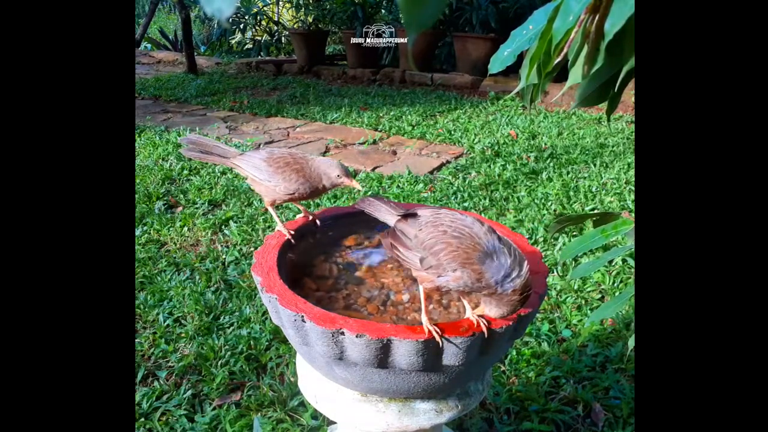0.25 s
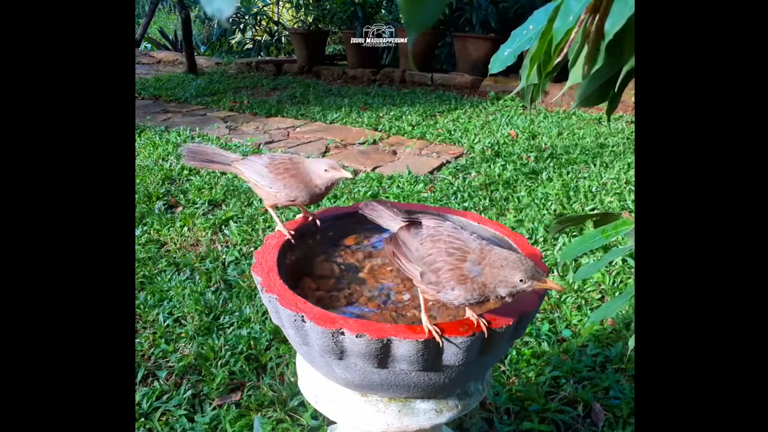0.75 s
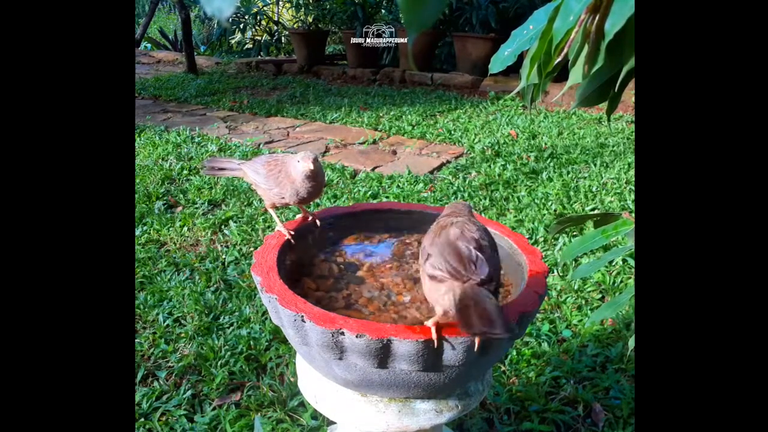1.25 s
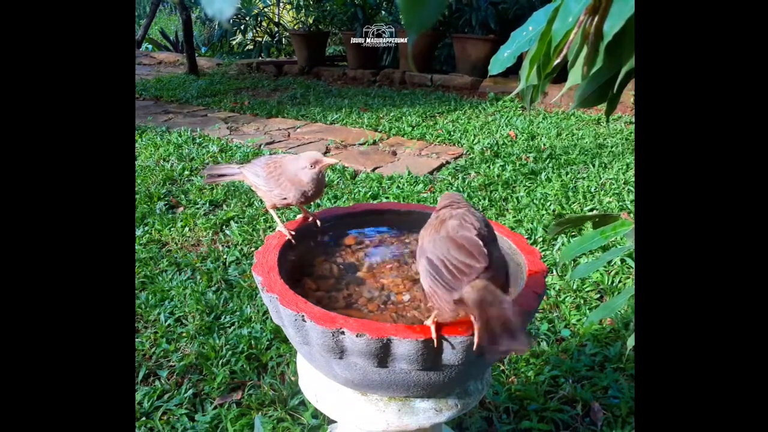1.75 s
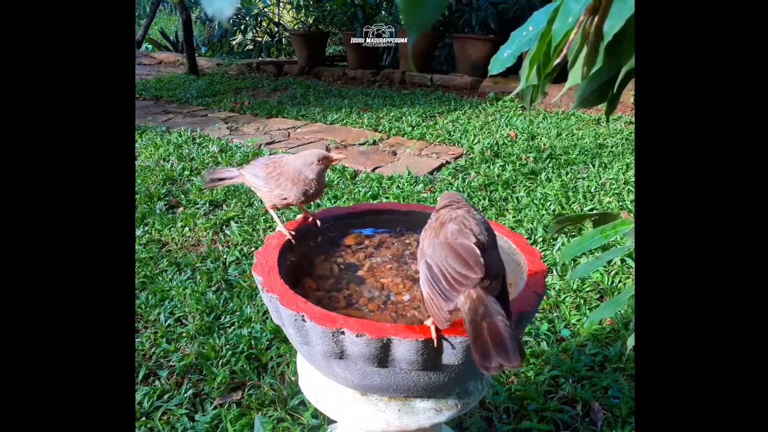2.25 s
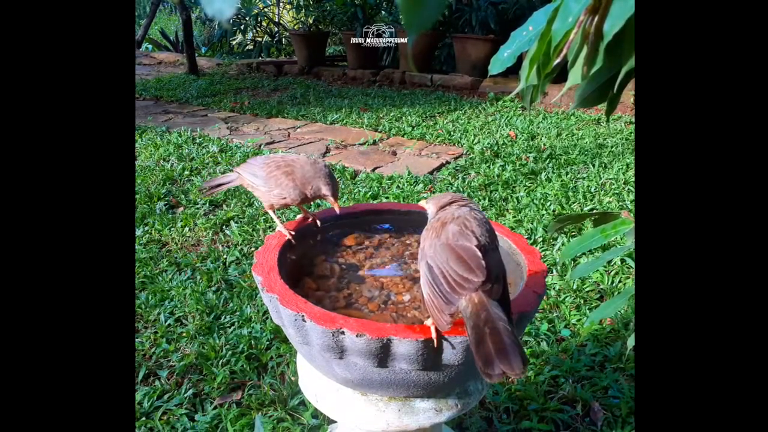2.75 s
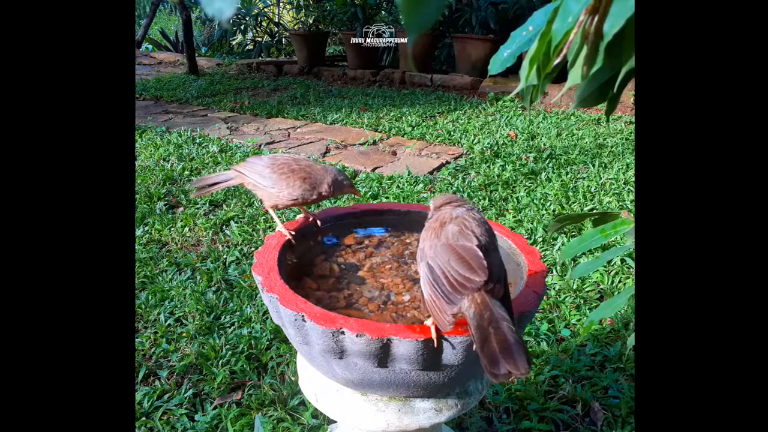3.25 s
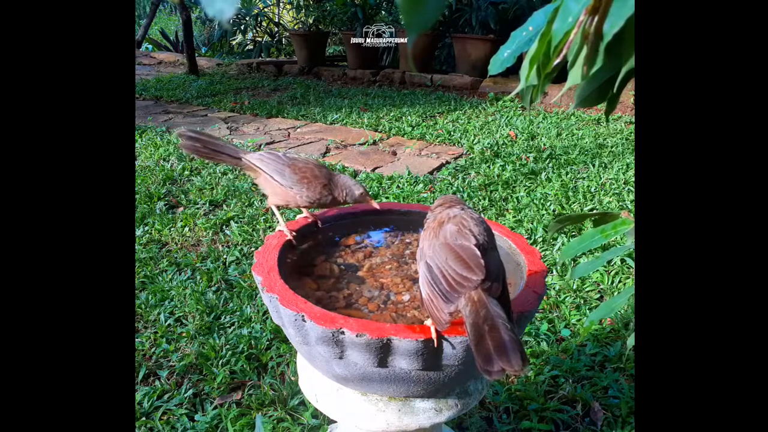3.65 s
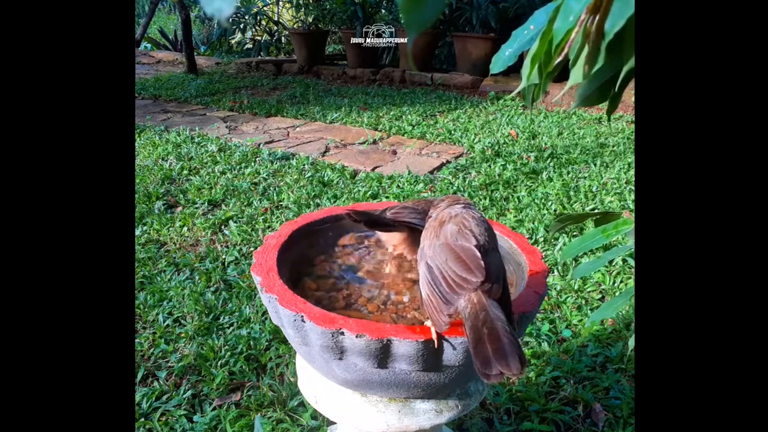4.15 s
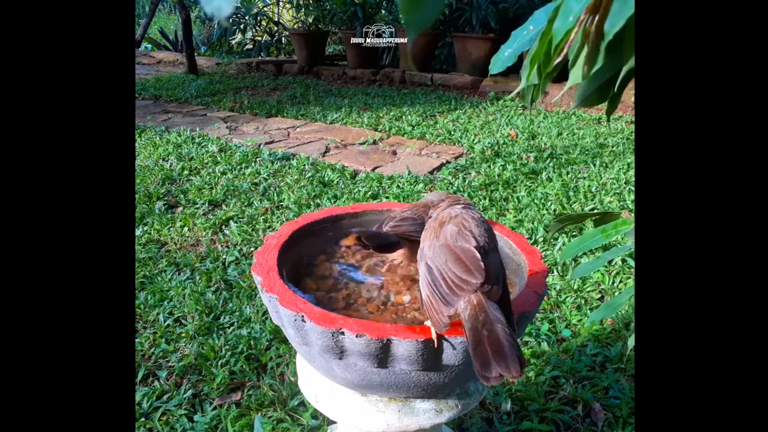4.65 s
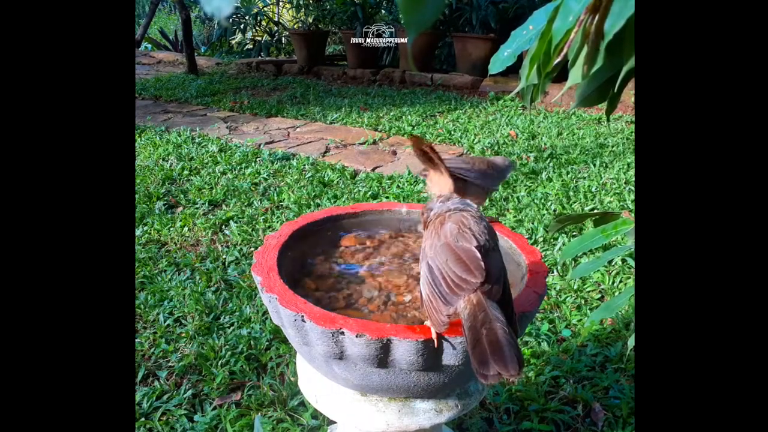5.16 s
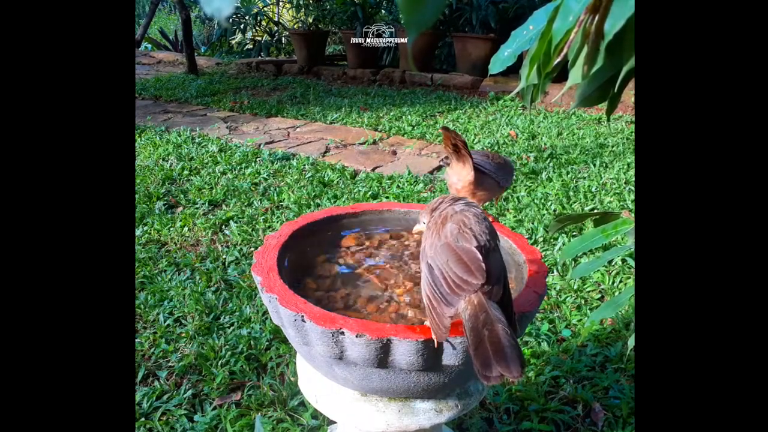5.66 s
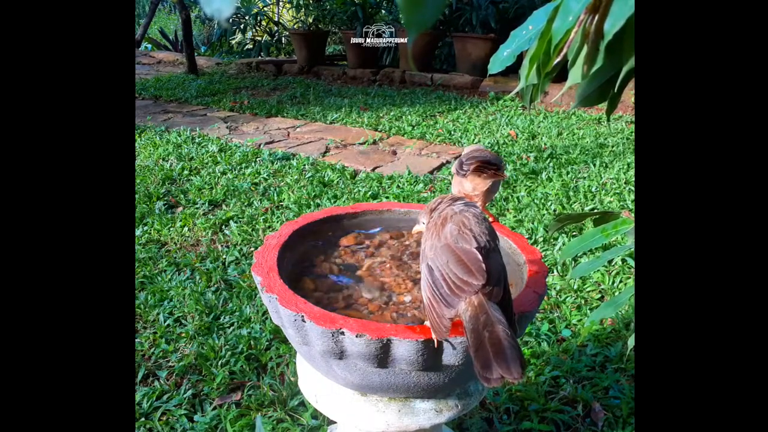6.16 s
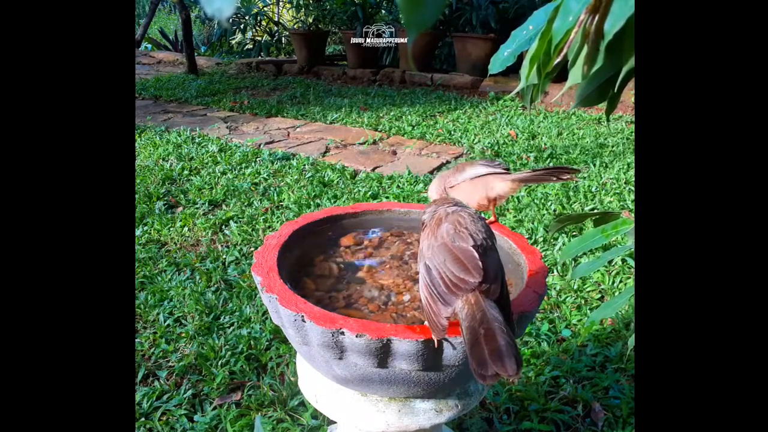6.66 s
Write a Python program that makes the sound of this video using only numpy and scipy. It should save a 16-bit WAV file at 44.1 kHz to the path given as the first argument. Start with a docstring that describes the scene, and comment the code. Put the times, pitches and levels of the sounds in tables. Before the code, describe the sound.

Two birds shake and splash in a stone water bowl, with far gliding hoots, chirping from trees, shrill insects and a faint engine drone.

```python
"""Two babblers at a garden bird bath, close to the microphones: wet feathers rustle, fling spray and push puffs
of air, all shaped noise; a foot plops into the water as a ringing air pocket, and claws tick on the stone.
Some way off two animals hoot in gliding tones, one breaking into a hoarse high register; birds chirp near by
and in the trees with short bent notes, some roughened by jitter.
Insects shrill throughout as pulsing bands of noise, over the low tones and rumble of distant engines."""
import sys
import numpy as np
from scipy import signal
from scipy.fft import rfft, irfft, next_fast_len
from scipy.io import wavfile
from scipy.ndimage import map_coordinates

SR = 44100
rng = np.random.default_rng(int(sys.argv[2]) if len(sys.argv) > 2 else 0)


def wav_out(sig):
    """Save sig, one row per channel (or a flat mono array), as 16-bit PCM at SR to the path in sys.argv[1]."""
    wavfile.write(sys.argv[1], SR, np.round(np.clip(np.atleast_2d(sig).T, -1, 1) * 32767).astype(np.int16))


N = 304731
T = np.arange(N) / SR


def amp(db):
    """Decibels to gain."""
    return 10 ** (np.asarray(db) / 20)


def unit(x):
    """Scaled to rms 1."""
    return x / np.sqrt(np.mean(np.abs(x) ** 2) + 1e-20)


def along(points, hz):
    """(Hz, value) points read on a log frequency axis."""
    f, v = np.transpose(points)
    return np.interp(np.log(hz + 1), np.log(f + 1), v)


def wobble(rate, size=N):
    """A smooth random curve, rate knots a second."""
    knots = rng.standard_normal(int(size * rate / SR) + 4)
    return map_coordinates(knots, [np.arange(size) * rate / SR])


def filtered(x, response):
    """x with its spectrum multiplied by a response of frequency."""
    m = next_fast_len(N + 8192)
    return irfft(rfft(x, m) * response(np.fft.rfftfreq(m, 1 / SR)), m)[..., :N]


def rush(spectrum):
    """Stereo noise of rms 1, alike in the bass and nearly unrelated in the treble."""
    # likeness of left and right: (frequency [Hz], correlation [-1 to 1])
    likeness = [(60, 0.96), (130, 0.9), (260, 0.84), (600, 0), (1500, 0), (6000, 0.031)]

    def mid_side(hz):
        turn = np.arccos(np.clip(along(likeness, hz), -1, 1)) / 2
        return amp(along(spectrum, hz)) * [np.cos(turn), np.sin(turn)]

    mid, side = filtered(rng.standard_normal((2, N)), mid_side)
    return unit(np.array([mid + side, mid - side]))


def band(centre_hz, width_hz):
    """A narrow stereo noise of rms 1."""
    noise = rng.standard_normal((2, N))
    return unit(filtered(noise, lambda hz: 1 / (1 + ((hz - centre_hz) / width_hz) ** 4)))


def add(track, s, sound):
    """Mix a sound into a track at time s."""
    part = track[max(round(s * SR), 0):][:len(sound)]
    part += sound[:len(part)]


def placed(x, lead_ms, left_db):
    """Direct sound at two microphones: the left hears it earlier by lead_ms and louder by left_db."""
    side = np.array([[.5], [-.5]])
    lead_s = side * lead_ms / 10 ** 3
    return amp(side * left_db) * filtered(x, lambda hz: np.exp(2j * np.pi * hz * lead_s))


def garden(x):
    """Scatter from trees and walls: a noise tail in which each frequency dies at its own speed."""
    # reverberation of the garden: (frequency [Hz], time to fall 60 dB [s])
    decay = [(200, 0.31), (2000, 0.51), (4500, 0.53), (10000, 0.039)]
    hz, t, z = signal.stft(rng.standard_normal((2, SR // 2)), SR, nperseg=256)
    fading = z * amp(-60 * t / along(decay, hz)[:, None])
    tail = signal.istft(fading, SR, nperseg=256)[1]
    tail = tail / np.linalg.norm(tail, axis=1, keepdims=True)
    return signal.fftconvolve(x[None], tail, axes=1)[:, :N]


def envelope(start, length, attack, release):
    """Rises from 0, is held to at most 1 and is back at 0 after length."""
    return np.clip(np.minimum((T - start) / attack, (start + length - T) / release), 0, 1)


def strokes(rows):
    """Gain of (s, length, dB) gestures, each a quick throw and a slower fall."""
    track = np.zeros(N)
    for s, length, db in rows:
        u = np.linspace(0, 1, int(length * SR))
        add(track, s, amp(db) * np.sin(np.pi * u ** .5) ** 2)
    return track


def note(length, start_hz, middle_hz, end_hz):
    """Phase and swell of one note whose pitch follows a parabola."""
    u = np.linspace(0, 1, int(length * SR))
    hz = np.polyval(np.polyfit([0, .5, 1], [start_hz, middle_hz, end_hz], 2), u)
    return 2 * np.pi * np.cumsum(hz) / SR, np.abs(np.sin(np.pi * u)) ** .7


def glide(hz, change_hz):
    """Start, middle and end pitch of a straight glide."""
    return hz - change_hz / 2, hz, hz + change_hz / 2


def chirp(length, start_hz, middle_hz, end_hz, rasp):
    """One note roughened by fast jitter of its phase."""
    phase, swell = note(length, start_hz, middle_hz, end_hz)
    return swell * np.sin(phase + 2 * rasp * wobble(501.0, len(phase)))


def whistle(length, start_hz, middle_hz, end_hz, rasp, overtone_db):
    """One soft-edged, wavering note with overtones."""
    phase, swell = note(length, start_hz, middle_hz, end_hz)
    phase = phase + 2 * rasp * wobble(130.7, len(phase))
    overtones = sum(np.sin((k + 1) * phase) / k ** 1.3 for k in range(1, 5))
    return swell ** 2 * (np.sin(phase) + amp(overtone_db) * overtones)


def hoots():
    """Nearly pure tones that jump up a register and turn hoarse when forced; a second animal joins in."""
    # the first animal: (time [s], length [s], low pitch [Hz], base level [dB], break after [s],
    # break length [s], high pitch before it sags [Hz], hoarse for [s])
    calls = [(-.05, .42, 673, -49.5, 0.079, .26, 806.6, 0.042),
             (0.749, 0.566, 685, -51.5, .05, .46, 798.8, 0.396),
             (1.519, 0.41, 641, -53.5, .125, .175, 765.5, .09), (2.184, 0.37, 645.4, -52, 0, 0, 646, 0.04)]
    # the second animal: (time [s], length [s], start [Hz], middle [Hz], end [Hz], relative level [dB])
    answers = [(0.286, 0.079, 771, 763, 742, -46.5), (0.344, 0.1, 679, 672, 670, -53),
               (0.885, 0.133, 621, 652, 680, -49.5), (1.255, 0.053, 854, 861, 815, -51)]
    attack_s, release_s = 0.068, 0.11
    # the pitch scoops up at the start and droops as the breath runs out
    scoop_hz, scoop_s, droop_hz, droop_s = 40.3, 0.059, 89, 0.158
    # the high register: entered fast, left slowly, sagging, louder
    break_up_s, break_down_s, sag_hz, high_db = .018, 0.0423, 88.5, 6
    # roughness 0-1; a hoarse voice is weaker
    clear_rough, hoarse_rough, hoarse_fade_s, hoarse_db = 0.19, 0.64, 0.031, -3
    voice, loudness = np.zeros(N), np.zeros(N)
    for s, length, low_hz, db, break_after, break_length, high_hz, hoarse_for in calls:
        break_s = s + break_after
        scoop = np.clip(1 - (T - s) / scoop_s, 0, 1)
        droop = np.clip(1 - (s + length - T) / droop_s, 0, 1)
        low = low_hz - scoop_hz * scoop - droop_hz * droop ** 2
        high = envelope(break_s, break_length, break_up_s, break_down_s)
        sag = sag_hz * np.interp(T, [break_s, break_s + break_length], [0, 1])
        hz = low + high * (high_hz - sag - low)
        hoarse = envelope(break_s, hoarse_for, break_up_s, hoarse_fade_s)
        rough = np.clip(clear_rough + (hoarse_rough - clear_rough) * hoarse, 0, 1)
        flutter = np.sqrt(1 - rough ** 2) + rough * unit(wobble(130) + 1j * wobble(130))
        breath = envelope(s, length, attack_s, release_s) ** 0.91
        swell = np.sqrt(2) * amp(db + high_db * high + hoarse_db * hoarse) * breath
        voice += swell * np.real(flutter * np.exp(2j * np.pi * np.cumsum(hz) / SR))
        loudness += swell
    for s, length, start_hz, middle_hz, end_hz, db in answers:
        phase, swell = note(length, start_hz, middle_hz, end_hz)
        add(voice, s, amp(db) * swell * np.sin(phase + 0.5 * wobble(99.3, len(phase))))
    direct = placed(voice, lead_ms=.2, left_db=6)
    husk = amp(-19.5) * loudness * band(723, 220)  # a husky haze around the tone
    return direct + amp(-9.5) * garden(voice) + husk


def insects():
    """A buzzing chorus that swells in waves, a throbbing trill and a cricket that chirps at an even pace."""
    # colour of the chorus: (frequency [Hz], relative density [dB per Hz])
    chorus_colour = [(5600, -48.5), (6250, -22.5), (6800, -18), (7300, -14.5), (7900, -13), (8700, -19),
                     (9400, -11), (9900, -5), (10250, -0.5), (10600, -1.5), (10900, -9.5), (11500, -17.5),
                     (11800, -44), (14000, -67)]
    # waves that build up slowly and then fall back together: (time of the fall [s], build-up [dB])
    waves = [(-.03, 1.5), (1.36, 2.5), (2.85, 2), (4.02, 3), (5.41, 2.5), (6.8, 4)]
    chorus_db, fall_back_s = -57, .11  # level between the waves, and how fast a wave ends
    points = [point for s, db in waves for point in ((s, db), (s + fall_back_s, 0))]
    build = np.interp(T, *np.transpose(points))
    buzz = 1 + 0.11 * np.sin(2 * np.pi * np.cumsum(148 + 2 * wobble(4.3)) / SR)
    chorus = amp(chorus_db + build + 0.16 * wobble(11)) * buzz * rush(chorus_colour)
    chorus = chorus * amp([[1], [-1]])  # 2 dB stronger on the left
    throb = 1 + 0.22 * np.sin(2 * np.pi * np.cumsum(12.5 + 1.0 * wobble(1.97)) / SR)
    trill = amp(-67) * throb * band(8243, 190)
    beat = np.cos(np.pi * (T - .59) / .643) ** 6  # a chirp every 0.643 s
    return chorus + trill + amp(-66) * beat * band(7270, 150)


def background():
    """Distant engines drone in slowly wavering low tones over a soft rumble, with a faint hiss."""
    # engine tones: (frequency [Hz], mean level [dB rms, before a slight tilt to the left])
    engine_tones = [(33.3, -67.5), (52.4, -60), (66.6, -58.5), (75, -63), (105, -68.5), (150, -77.5),
                    (225.4, -78.5)]
    # colour of the rumble: (frequency [Hz], relative density [dB per Hz])
    air_colour = [(20, -16), (40, -5.5), (65, 1.5), (100, -3), (200, -11.5), (400, -19.5), (700, -24),
                  (1200, -29.5), (2000, -30.5), (6000, -40), (12000, -73)]
    drone = np.zeros(N)
    for hz, db in engine_tones:
        level = amp(db + wobble(2.11)) * np.sqrt(2)
        drone += level * np.sin(2 * np.pi * (hz * T + rng.random()) + 0.26 * wobble(1.96))
    rumble = amp(-57.5) * rush(air_colour) * amp(wobble(3.96))
    hiss = amp(-70.5) * rush([(500, -17), (2500, -16.0), (9000, 18.5), (11500, -11), (12500, -41)])
    return (drone + rumble) * amp([[.5], [-.5]]) + hiss  # low sounds 1 dB stronger on the left


def tree_birds():
    """Raspy chirps and thin whistles, bent notes heard mostly by way of the trees."""
    # buzzy high chirps: (time [s], middle pitch [Hz], relative level [dB])
    buzzes = [(.28, 5860, -60.5), (.467, 5300, -56.5), (.654, 4790, -61), (5.845, 5670, -64.5),
              (5.86, 4670, -66), (6.035, 5080, -60.5), (6.161, 5085, -56)]
    # down-slurred chirps: (time [s], middle pitch [Hz], fall [Hz], relative level [dB])
    slurs = [(.134, 3650, 670, -70), (.386, 2760, 820, -57.5), (1.208, 2080, 188, -71),
             (1.448, 2007, 80, -71), (4.085, 2918, 1000, -49), (4.297, 2245, 1050, -46),
             (4.432, 2020, 500, -45.5), (5.296, 2425, 100, -54.5)]
    # a rising call: (time [s], relative level [dB], relative level of the lead-in note [dB])
    risers = [(.802, -53.5, -68), (6.314, -52.5, -60.5)]
    # its two notes: (length [s], start [Hz], middle [Hz], end [Hz])
    lead_in = (.063, 2625, 2940, 3350)
    riser_note = (.1, 3560, 4040, 4080)
    # a far two-note whistle: (time [s], first middle pitch [Hz], second middle pitch [Hz],
    # relative level of the second note [dB], rasp [units of 2 radians of phase jitter])
    whistles = [(.38, 1395, 1474, -72, 1.1), (1.84, 1377, 1490, -69, 0.52),
                (3.251, 1501, 1404, -66.5, 1.46), (4.7, 1355, 1495, -69, 0.55),
                (6.1, 1387, 1550, -67.5, 0.6)]
    # a far nasal cry in two notes: (time [s], length [s], start [Hz], middle [Hz], end [Hz],
    # relative level [dB], overtones [dB])
    cry = [(5.665, 0.1405, 932, 1034, 1046, -59.5, -9.5), (5.765, 0.1295, 1045, 1008, 936, -67, 1.5)]
    # a faint low coo: (time [s], length [s], start [Hz], middle [Hz], end [Hz], relative level [dB])
    coo = (7, .14, 564, 612, 660, -65.5)
    buzz_length_s, buzz_fall_hz, buzz_rasp = .076, 550, 1.3
    slur_length_s, slur_rasp = .052, 0.5
    riser_after_s, riser_rasp = .021, 0.56
    first_length_s, first_db, second_after_s, second_length_s, rise_hz = 0.27, -3, .12, 0.216, 40
    voice = np.zeros(N)
    for s, hz, db in buzzes:
        add(voice, s, amp(db) * chirp(buzz_length_s, *glide(hz, -buzz_fall_hz), buzz_rasp))
    for s, hz, fall_hz, db in slurs:
        add(voice, s, amp(db) * chirp(slur_length_s, *glide(hz, -fall_hz), slur_rasp))
    for s, db, lead_db in risers:
        add(voice, s, amp(lead_db) * chirp(*lead_in, riser_rasp))
        add(voice, s + riser_after_s, amp(db) * chirp(*riser_note, riser_rasp))
    for s, first_hz, second_hz, db, rasp in whistles:
        first = whistle(first_length_s, *glide(first_hz, rise_hz), rasp, overtone_db=-40)
        second = whistle(second_length_s, *glide(second_hz, rise_hz), rasp, overtone_db=-40)
        add(voice, s, amp(db + first_db) * first)
        add(voice, s + second_after_s, amp(db) * second)
    for s, *shape, db, overtone_db in cry:
        add(voice, s, amp(db) * whistle(*shape, rasp=0.21, overtone_db=overtone_db))
    s, *shape, db = coo
    add(voice, s, amp(db) * whistle(*shape, rasp=0.43, overtone_db=-16))
    return amp(-2.5) * placed(voice, lead_ms=0.11, left_db=6.5) + amp(1.0) * garden(voice)


def wings():
    """Wet feathers rustle, fling spray and push puffs of air: three noises under the wing strokes."""
    # shakes of wet feathers: (time [s], length [s], relative level [dB])
    feathers = [(.195, 0.24, -67), (.34, 0.35, -66.5), (.6, 0.62, -70), (.95, 0.64, -77.5),
                (1.42, 0.32, -82), (1.59, 0.2, -73.5), (5.075, 0.083, -65.5), (5.175, .11, -74.5),
                (5.345, .13, -69), (5.57, 0.29, -75)]
    # colour of the rustle: (frequency [Hz], relative density [dB per Hz])
    feather_colour = [(200, 0.5), (600, -8), (1500, -12), (4000, -3), (8000, 3.5), (11000, 4), (13000, 2.5),
                      (16000, -26)]
    # wing strokes that fling spray: (time [s], length [s], level [dB])
    flicks = [(.24, 0.38, -60), (0.366, 0.083, -46.5), (0.419, 0.07, -50.5), (.44, 0.26, -61),
              (3.944, 0.04, -50), (3.973, 0.058, -48), (4.432, 0.031, -55.5), (5.085, 0.034, -63),
              (5.359, 0.049, -67), (6.733, 0.044, -51)]
    # colour of the spray: (frequency [Hz], relative density [dB per Hz])
    spray_colour = [(300, 1), (900, -3), (2800, -1), (6000, 0), (10000, -1), (12000, -1), (15500, -22)]
    # air pushed by bouts of flapping: (time [s], length [s], level [dB])
    wafts = [(.16, 0.4, -62), (.395, 0.21, -58), (.73, 0.39, -54.5), (.98, 0.55, -59.5)]
    puff_colour = [(60, -27), (130, -3), (300, -9.0), (550, -4), (1200, -15.5), (3000, -34), (8000, -55)]
    crackle = amp(1.3 * wobble(60) + 2.0 * wobble(900))
    rustle = strokes(feathers) * amp(11.5) * unit(rush(feather_colour) * crackle)
    droplets = amp(3.5 * wobble(1200) + 2 * wobble(150))
    spray = strokes(flicks) * unit(rush(spray_colour) * droplets)
    wingbeat = np.cos(2 * np.pi * np.cumsum(18 + 2 * wobble(4.96)) / SR)  # about 18 beats a second
    puffs = unit(rush(puff_colour) * amp(5.7 * wingbeat))
    return rustle + spray + strokes(wafts) * puffs


def chip():
    """The sharp chip of a bird close by: a quick falling note with a strong octave."""
    # pitch of the note: (start [Hz], middle [Hz], end [Hz])
    chip_pitch = (3606, 3350, 3066)
    chip_s, length_s, level_db = 3.509, 0.035, -36.5
    phase, swell = note(length_s, *chip_pitch)
    size = len(phase)
    jittered = phase + .15 * wobble(500, size)
    first, second, third = np.sin(np.outer([1, 2, 3], jittered))
    tone = first + amp(6.0 + 1.7 * wobble(450, size)) * second + amp(-6.5) * third
    voice = np.zeros(N)
    add(voice, chip_s, amp(level_db) * swell ** 1.35 * tone)
    return placed(voice, lead_ms=0.055, left_db=-5.5) + amp(-23.5) * garden(voice)


def footfalls():
    """Drops and claws on the stone: noise cracks with a short rim ring, then scrapes in a narrow band."""
    # drops and claws on the stone: (time [s], level [dB], rim ring relative to it [dB])
    ticks = [(3.9758, -30.5, -4), (3.9865, -26, -22), (6.671, -58, 13.5), (6.8166, -37, -3)]
    # claws scraping for a hold on the rim: (time [s], length [s], level [dB])
    scrapes = [(6.715, 0.12, -60.5), (6.8, .2, -61)]
    t = np.arange(SR // 8) / SR
    rim_hz, crack_t60_s, ring_t60_s = 2850, 0.0012, 0.003
    track = np.zeros(N)
    bright = signal.butter(2, [4000, 10000], "bandpass", fs=SR)
    for s, db, ring_db in ticks:
        noise = unit(signal.lfilter(*bright, rng.standard_normal(len(t))))
        crack = amp(-60 * t / crack_t60_s) * noise
        ring = amp(ring_db - 60 * t / ring_t60_s) * np.sin(2 * np.pi * rim_hz * t)
        add(track, s, amp(db) * (crack + ring))
    scrape = strokes(scrapes) * unit(band(rim_hz, 300) * amp(5.5 * wobble(70)))
    return placed(track, lead_ms=0.0093, left_db=-.5) + scrape


def plop():
    """The air pocket under a foot entering the water drops in pitch as it opens, then rings out."""
    plop_s, final_hz, drop_hz, settle_s = 3.9768, 990, 800, 0.00071
    # a short burst and a longer ring of about equal strength
    burst_db, burst_hold_s, burst_t60_s, ring_db, ring_t60_s = -30, 0.0044, 0.014, -29.5, 0.067
    t = np.arange(SR // 8) / SR
    hz = final_hz + drop_hz * np.exp(-t / settle_s)
    burst = amp(burst_db - 60 * np.maximum(t - burst_hold_s, 0) / burst_t60_s)
    onset = 1 - np.exp(-t / 0.00017)
    swell = onset * (burst + amp(ring_db - 60 * t / ring_t60_s))
    ring = np.zeros(N)
    add(ring, plop_s, swell * np.sin(2 * np.pi * np.cumsum(hz) / SR))
    return placed(ring, lead_ms=0.064, left_db=0.0) + amp(-26.5) * garden(ring)


def scene():
    """Everything heard from beside the bath."""
    far = hoots() + insects() + background() + tree_birds()
    near = wings() + chip() + footfalls() + plop()
    return far + near


def record(dry):
    """The recorder keeps nothing above its band limit."""
    top_hz = 15650
    return filtered(dry, lambda hz: hz < top_hz)


dry = scene()
out = record(dry)
wav_out(out)
```